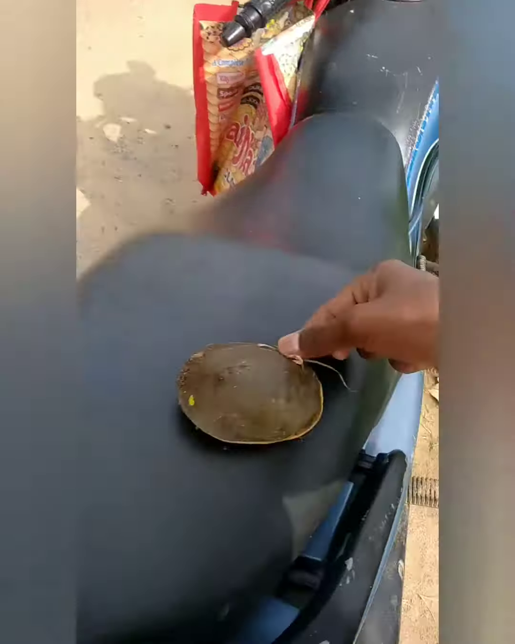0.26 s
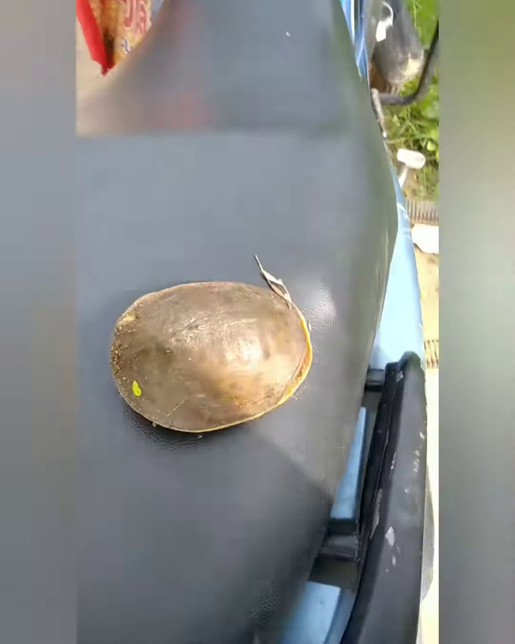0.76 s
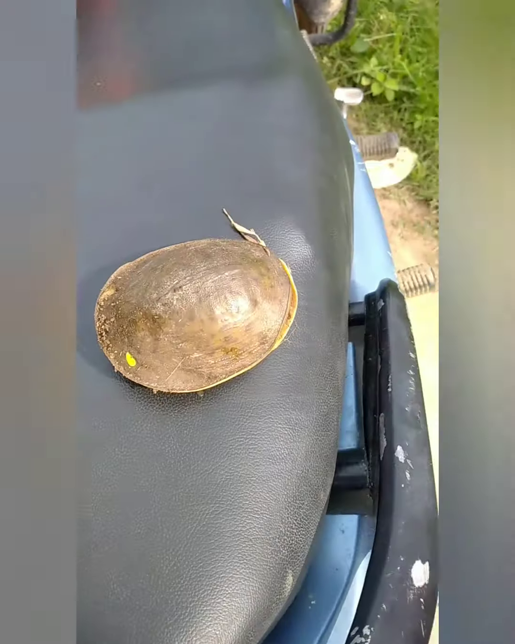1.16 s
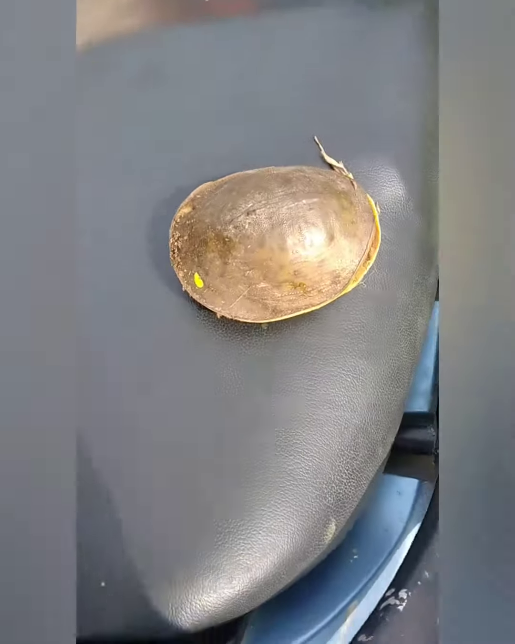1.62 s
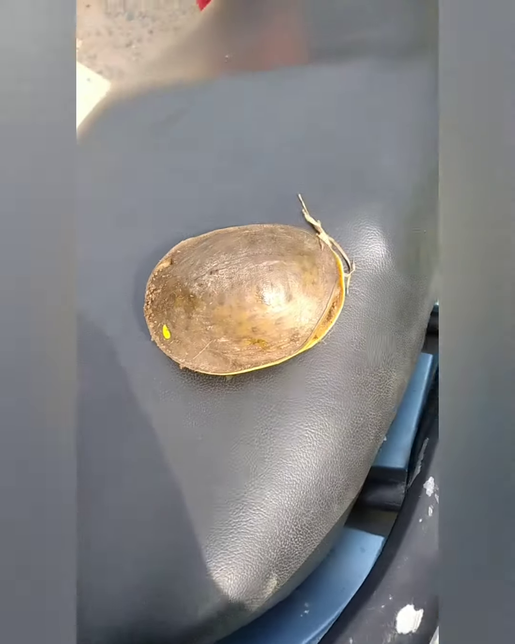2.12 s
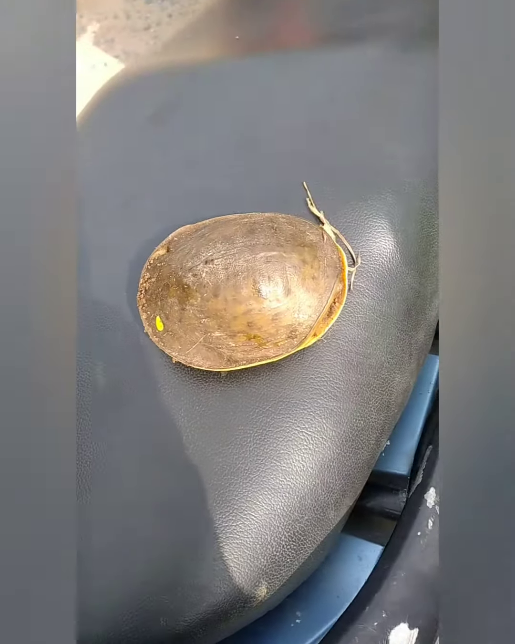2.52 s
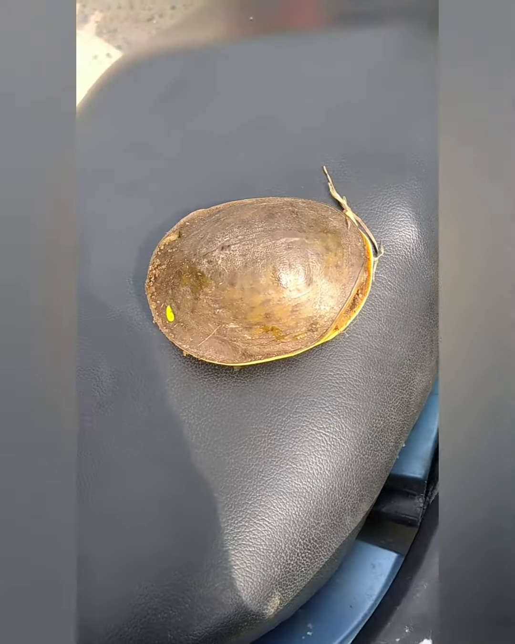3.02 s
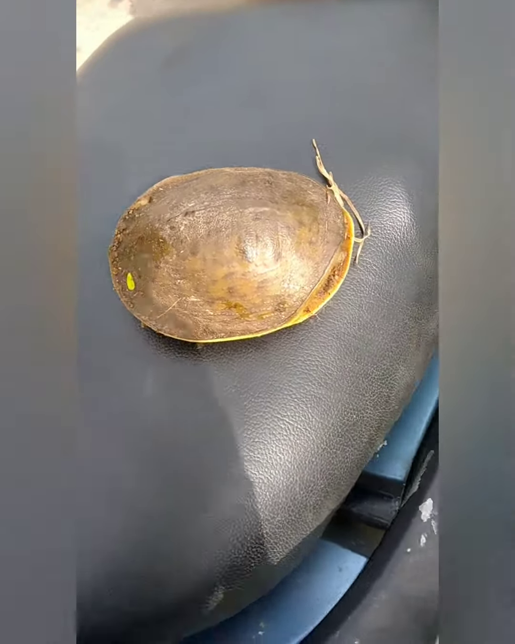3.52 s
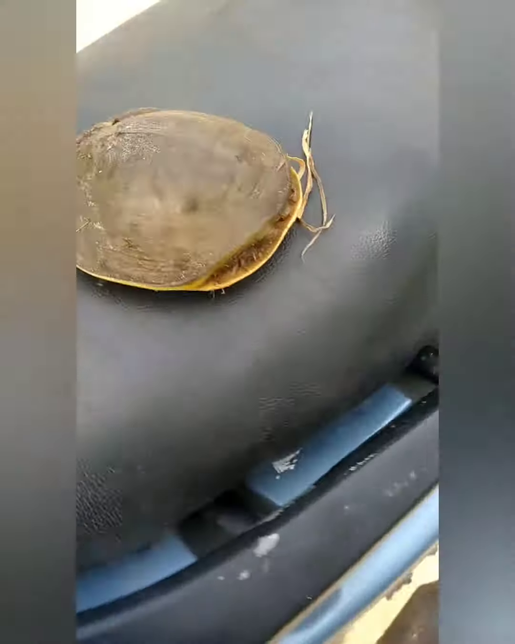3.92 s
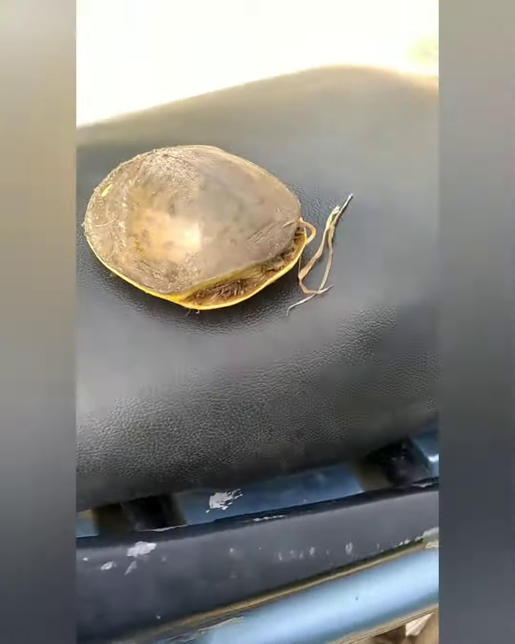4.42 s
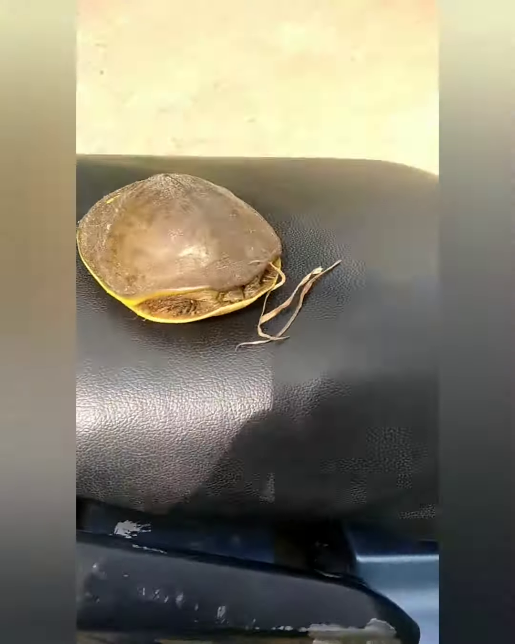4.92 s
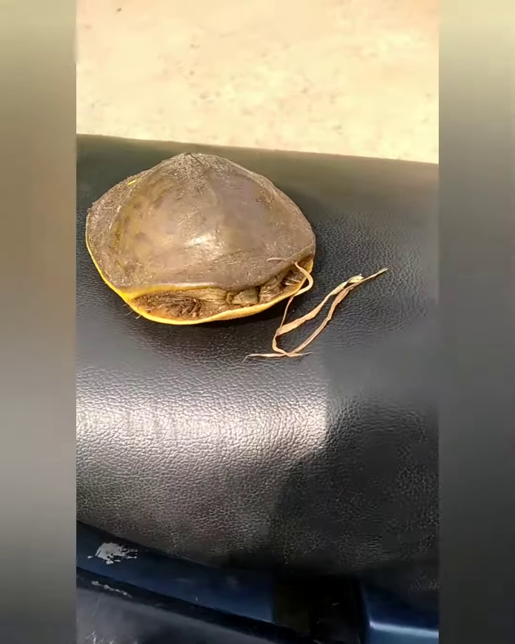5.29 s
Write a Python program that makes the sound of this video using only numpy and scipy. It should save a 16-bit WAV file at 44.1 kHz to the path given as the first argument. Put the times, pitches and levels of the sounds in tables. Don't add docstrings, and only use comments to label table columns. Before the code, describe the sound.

A quiet open-air scene on a handheld phone with two microphones. Low distant traffic hum, heavier on the left, and a thin insect fizz near 10 kHz run throughout, with slight gaps from phone processing. Faint short bird whistles slide or arch around 3 kHz, mostly in the first three seconds. From 0 to 1.4 s soles scuff softly on grit, with dry ticks at 0.3 s and a tight cluster near 0.67 s. At about 1.47 s a fingertip brushes the left microphone; from 1.6 s it drags with a rough stuttering rub, ending around 1.66 s in a loud dull knock, then a small bump at 1.78 s. The right side hears none of this. It stays calm until about 3.4 s, when grit ticks and scuffs return, at 3.8 and 4.0 s, then crisper crunches from 4.6 s, strongest near 5.3 s, fading out.

```python
import sys
import numpy as np
from scipy import signal
from scipy.fft import rfft, irfft
from scipy.io import wavfile
from scipy.ndimage import uniform_filter1d

SR = 44100
rng = np.random.default_rng(int(sys.argv[2]) if len(sys.argv) > 2 else 0)


def volts_from_decibels(level):
    exponent = np.asarray(level, float) / 20
    return 10 ** exponent


def master_out(mix):
    frames = np.transpose(np.atleast_2d(mix))
    ceiling = np.clip(frames, -1, 1)
    pcm = np.round(ceiling * 32767).astype(np.int16)
    wavfile.write(sys.argv[1], SR, pcm)


N = 244755
TIME = np.arange(N) / SR
FREQ = np.maximum(np.fft.rfftfreq(N, 1 / SR), 1)

# freq_hz, density_db
TRAFFIC_SPECTRUM = [(18, -60), (30, -25.5), (109, -1), (245, -3.5), (311, -13), (386, -12), (579, -13.5),
                    (684, -14.5), (848, -18.5), (1210, -19.5), (1780, -25.5), (3150, -25.5), (4090, -29),
                    (5200, -29), (9000, -28.5), (11700, -79), (19800, -120)]
# freq_hz, left_minus_right_db
PORT_BALANCE = [(60, 18), (110, 15), (200, 18), (380, 11.5), (700, -3), (1290, 1.5), (2380, -2.5),
                (4400, 1), (8120, -4), (15000, 37)]
# freq_hz, correlation_0_to_1
PORT_LIKENESS = [(60, 0.56), (130, 0.82), (300, .85), (640, 1), (1400, 0.37), (3100, 0.13), (6000, 0.038),
                 (15000, .05)]
PORT_LAG_S = 0.000348
# freq_hz, gain_db
RIGHT_PORT = [(20, 4), (9000, -3), (11500, -8), (16000, -32)]
# freq_hz, left_share_0_to_1, right_share_0_to_1
MUTED_SHARE = [(1500, 0, 0), (2800, .1, .08), (3800, .17, .13), (4600, .18, .16), (5000, .55, .55),
               (5400, .25, .25), (5800, .33, .33), (6500, .1, .1), (7600, .18, .18), (8400, .03, .03),
               (11000, 0, 0), (11400, .35, .9), (12200, .22, .75), (13000, .18, .6), (14200, .22, .65),
               (14500, .97, .98)]

# time_s, level_db
INSECT_LEVEL = [(0, -61), (.49, -62.5), (1.1, -59.5), (1.31, -62), (1.4, -60), (1.55, -65), (1.76, -59),
                (2.1, -61.5), (3.24, -61), (3.8, -60), (4.2, -57.5), (4.38, -58), (4.55, -63.5),
                (5.02, -60), (5.2, -62.5), (5.55, -63.5)]
# freq_hz, density_db
INSECT_SPECTRUM = [(4880, -38), (8300, -34), (8850, -22), (9710, -2.5), (10300, -2), (10800, -7),
                   (11100, -18), (11700, -26.5), (13300, -23.5), (14400, -45)]

# start_s, length_s, start_hz, end_hz, level_db
SLIDES = [
    (.92, .05, 3250, 2660, -67),
    (.965, .065, 2660, 2570, -68),
    (1.29, .05, 3000, 2600, -73),
    (1.63, .05, 3050, 2600, -67),
    (2.27, .11, 2750, 3400, -76),
    (2.43, .08, 3420, 3070, -70),
    (2.85, .08, 2880, 3280, -68),
    (3.56, .08, 2750, 2600, -73),
]
# start_s, length_s, edge_hz, top_hz, level_db
ARCHES = [
    (.075, .075, 2560, 2780, -64),
    (1.85, .16, 3140, 3560, -69),
    (2.93, .12, 3270, 3420, -78),
]

# peak_s, level_db, rise_s, fall_s, brightness_db
SCUFFS = [(.13, -59, .4, .2, -8.5), (.33, -65.5, 0.19, .1, -5), (.288, -53.5, 0.018, 0.033, -13),
          (.368, -55, 0.068, .008, 1.5), (.658, -57, .04, 0.17, -9), (.69, -54, .1, 0.011, -6),
          (.978, -62, 0.048, 0.24, -2), (1.218, -62, 0.32, 0.17, 1.5), (1.35, -63, 0.1, 0.083, -4),
          (3.44, -66, 0.28, .05, -1.5), (3.485, -56.5, 0.072, 0.054, -7), (3.6, -66, 0.12, 0.13, -6),
          (3.793, -49.5, 0.059, 0.015, 3.5), (3.86, -60, 0.16, 0.2, -6), (4.035, -55, 0.1, 0.047, -2),
          (3.752, -59, 0.011, .1, 3.5), (4.53, -65, 0.055, .25, -12), (4.654, -57, 0.23, 0.88, -1),
          (4.908, -53.5, 0.026, 0.096, 6), (4.97, -51.5, 0.11, 0.056, -8), (5.12, -74, 0.18, 0.46, -3),
          (5.21, -60, .014, 0.23, 4.5), (5.312, -47, .04, 0.076, -5), (5.4, -66, .1, 0.79, -1)]
# freq_hz, level_db
GRIT_BODY = [(500, -6), (1100, -6.5), (1900, 2.5), (3000, 1), (4200, 5), (5200, -9.5), (7000, -4.5)]
# freq_hz, level_db
GRIT_HISS = [(4500, 3.5), (5500, -12.5), (7600, 3.5), (8800, 4), (10200, 9.5), (11200, -13), (11800, -46)]
# freq_hz, level_db
GRIT_TOP = [(10800, -25), (11400, 1), (13000, 1.5), (14300, -1), (14700, -33), (16500, -38)]
# time_s, peak_db, ring_hz, left_minus_right_db
TICKS = [(.2216, -45, 2250, 8), (.2865, -35, 3400, 12), (.3255, -45, 1190, 22), (.6585, -34, 2290, 0),
         (0.664, -30, 1990, -16), (0.667, -34, 2330, 12), (.6745, -25.5, 2280, 5), (0.69, -44, 1960, 1.5),
         (.9702, -41.5, 2820, 23), (1.3142, -45, 1500, 30), (1.333, -44.5, 1310, 10), (1.506, -50, 1290, 6),
         (1.5244, -46, 1280, 2), (3.4182, -47, 1890, 12), (3.4454, -44, 3970, 15), (3.4517, -38.5, 3050, 4),
         (3.4604, -52, 3000, 1.5), (3.469, -51, 4500, 7), (3.477, -37, 1970, 12), (3.5018, -42, 1900, 14),
         (3.515, -45.5, 1860, 14), (3.7926, -35.5, 4070, 24), (3.9134, -42, 4040, 18),
         (4.53, -45, 2100, 11), (4.3234, -43, 3340, 15), (4.68, -40, 3160, 13), (4.72, -43, 3300, 5),
         (4.796, -43, 3020, 10), (4.904, -33, 4160, -11)]
# time_s, peak_db, ring_hz, crack_db
SNAPS = [(.365, -41.5, 2650, 4), (1.5144, -58, 2010, 4), (1.585, -56, 1610, 6), (2.4187, -58.5, 1270, 13),
         (2.5624, -66, 1260, 14), (3.353, -54, 2870, 5), (3.5535, -54.5, 2520, 18), (3.606, -53, 2570, 0),
         (3.781, -43, 3980, 8), (4.113, -56, 2980, 10), (4.0673, -38, 3510, -5), (4.7744, -54, 1950, 6),
         (4.835, -58, 3000, 8), (4.353, -62, 3000, 10), (4.614, -38, 2100, 2.5), (4.858, -58, 1440, 8),
         (4.892, -40.5, 3950, 9.5), (4.964, -38, 3540, 12.5), (4.9686, -36.5, 2750, -2),
         (4.974, -38, 3630, 5), (4.9904, -52, 4140, 6), (5.2101, -44.5, 3620, -4)]

# peak_s, level_db, rise_s, fall_s, pressure_db
GRAZES = [
    (1.472, -46.5, 0.053, 0.009, 5),
    (1.52, -60, .025, .03, 8),
    (1.59, -61, .013, 0.024, 6),
    (1.786, -64, .047, 0.13, 10.5),
]
# time_s, level_db, pressure_db
DRAG = [
    (1.601, -41, 3),
    (1.62, -37, -11),
    (1.64, -29.5, -6.5),
    (1.654, -28.5, -4.5),
    (1.661, -28.5, 0.5),
    (1.675, -29.5, -0.5),
    (1.689, -46, -18),
    (1.705, -50, 1.5),
    (1.76, -74, 9),
]
# freq_hz, level_db
SKIN_BODY = [(500, -15), (900, -10.5), (1400, 0), (1700, -3), (2100, -0.5), (2900, -3), (3300, -3),
             (4000, -3.5), (4500, 1), (4850, -11), (5500, -16)]
# freq_hz, level_db
SKIN_RUMBLE = [(30, -20), (70, -7), (120, 5), (220, -1), (490, 1.5), (680, -1), (850, 1), (1200, -6)]
# freq_hz, level_db
SKIN_HISS = [(4600, -37), (5200, -3), (7500, -2), (9000, -10), (10200, -12), (12000, -10.5), (14300, -5.5),
             (14800, -55)]
# time_s, peak_db, ring_hz, t60_s
BUMPS = [(1.598, -13.5, 450, 0.0069), (1.5982, -15, 900, 0.004), (1.641, -27, 1390, 0.0067),
         (1.652, -19, 1500, 0.014), (1.6598, -14, 490, 0.051), (1.6592, -16, 680, 0.05),
         (1.665, -15, 1450, 0.018), (1.6642, -17.5, 326, 0.029), (1.664, -16, 2090, 0.025),
         (1.662, -18.5, 980, 0.032), (1.6565, -25, 520, 0.02), (1.78, -25.5, 680, 0.0046),
         (1.779, -47, 1500, 0.0037), (4.991, -36, 740, 0.0073)]


def across(table, floor=None):
    hz, value = np.transpose(table)
    return np.interp(np.log(FREQ), np.log(hz), value, floor, floor)


def unit(x):
    return x / np.sqrt(np.mean(x ** 2))


def colour(x, table):
    return unit(irfft(rfft(x) * volts_from_decibels(across(table, floor=-88)), N))


def walk(rate_hz):
    hold = int(SR / rate_hz)
    steps = np.repeat(rng.standard_normal(N // hold + 1), hold)
    return 1.66 * uniform_filter1d(uniform_filter1d(steps, hold), hold)[:N]


def grains(per_s, spread_db, smooth, tail_s):
    hit, size = rng.random(N), rng.exponential(size=N)
    slips = (hit < per_s / SR) * volts_from_decibels(np.minimum(spread_db * size, 14))
    puffs = signal.lfilter([1], [1, -np.exp(-1 / (tail_s * SR))], slips)
    return (unit(puffs) + smooth) * rng.standard_normal(N)


def strokes(rows, per_db):
    t = TIME[::16]
    s, db, rise, fall, extra_db = np.transpose(rows)[..., None]
    before = (s - t) / np.maximum(rise, .003)
    after = (t - s) / np.maximum(fall, .003)
    away = np.where(t < s, before, after)
    power = volts_from_decibels(2 * (db + per_db * extra_db - 20 * np.minimum(away, 9))).sum(axis=0)
    return np.interp(TIME, t, np.sqrt(power))


def ring(hz, t60, seconds=.08):
    t = np.arange(int(seconds * SR)) / SR
    return np.sin(2 * np.pi * hz * t) * volts_from_decibels(-60 * t / t60) * (1 - np.exp(-t / 0.00017))


def add(out, x, s):
    i = int(s * SR)
    out[..., i:i + x.shape[-1]] += x[..., :N - i]


def ports(x, other, pan_db, like):
    late = np.interp(TIME - PORT_LAG_S, TIME, x)
    tilt = volts_from_decibels(-pan_db)
    right = tilt * (like * late + np.sqrt(1 - min(like, 1) ** 2) * other)
    return 2 / np.sqrt(1 + tilt ** 2) * np.array([x, right])


def air():
    left, other = rfft(rng.standard_normal((2, N)))
    like = np.clip(across(PORT_LIKENESS), 0, 1)
    tilt = volts_from_decibels(-across(PORT_BALANCE))
    late = left * np.exp(-2j * np.pi * FREQ * PORT_LAG_S)
    right = tilt * (like * late + np.sqrt(1 - like ** 2) * other)
    spectrum = volts_from_decibels(across(TRAFFIC_SPECTRUM, floor=-90)) / np.sqrt(1 + tilt ** 2 + like * tilt)
    pair = irfft(np.array([left, right]) * spectrum, N)
    level_db = -56 + 0.74 * walk(1.268) + 0.26 * walk(9)
    return pair * volts_from_decibels(level_db) / np.sqrt(np.mean(pair.mean(axis=0) ** 2))


def insects():
    s, db = np.transpose(INSECT_LEVEL)
    left, right = (colour(grains(400, spread_db=2.5, smooth=3.4, tail_s=0.00027), INSECT_SPECTRUM)
                   for _ in range(2))
    level = volts_from_decibels(np.interp(TIME, s, db) + 1.0 * walk(12))
    return level * ports(left, right, pan_db=1.0, like=0.068)


def bird():
    out, waver = np.zeros(N), walk(60)
    sag = .15
    notes = [(s, length, a, (a + b) / 2 - sag * abs(a - b), b, db) for s, length, a, b, db in SLIDES]
    notes += [(s, length, edge, top, edge, db) for s, length, edge, top, db in ARCHES]
    for s, length, start_hz, mid_hz, end_hz, db in notes:
        u = np.linspace(-1, 1, int(length * SR))
        bend_hz = (start_hz + end_hz) / 2 - mid_hz
        hz = mid_hz + (end_hz - start_hz) / 2 * u + bend_hz * u ** 2
        whistle = np.sin(2 * np.pi * np.cumsum(hz) / SR)
        add(out, volts_from_decibels(db) * (1 - u ** 4) * whistle, s)
    out = out * volts_from_decibels(2.5 * waver - 1)
    return ports(out, out, pan_db=-1.0, like=0.84)


def scuffs():
    body, hiss, top = strokes(SCUFFS, 0), strokes(SCUFFS, 1), strokes(SCUFFS, 0.85)
    heard = []
    for _ in range(2):
        crunch = grains(200, spread_db=5.0, smooth=.9, tail_s=.002)
        dust = grains(500, spread_db=1.0, smooth=0.76, tail_s=0.0016)
        scuff = body * colour(crunch, GRIT_BODY)
        scuff += volts_from_decibels(3.0) * hiss * colour(dust, GRIT_HISS)
        scuff += volts_from_decibels(-5.5) * top * colour(dust, GRIT_TOP)
        heard.append(scuff)
    return ports(*heard, pan_db=3, like=0.25)


def ticks():
    out = np.zeros((2, N))
    t = np.arange(900) / SR
    rows = [(s, db, hz, -20, 0.017, pan_db) for s, db, hz, pan_db in TICKS]
    rows += [(s, db, hz, crack_db, 0.016, 12.5) for s, db, hz, crack_db in SNAPS]
    crack_band = signal.butter(4, [7500, 13500], "bandpass", fs=SR, output="sos")
    noises = rng.standard_normal((len(rows), 900))
    for (s, db, hz, crack_db, t60, pan_db), noise in zip(rows, noises):
        burst = (0.35 * noise + 2.67 * (t == 0)) * volts_from_decibels(-60 * t / t60)
        modes = ((hz, 6.0, 0), (min(1.334 * hz, 4300), 7.0, -1.5), (1200, 2.5, -8))  # Hz, Q, dB
        body = sum(volts_from_decibels(mode_db) * signal.lfilter(*signal.iirpeak(f, q, fs=SR), burst)
                   for f, q, mode_db in modes)
        crack = signal.sosfilt(crack_band, burst)
        snap = volts_from_decibels(db) * (body / abs(body).max() + volts_from_decibels(crack_db) * crack / abs(crack).max())
        share = 2 / np.sqrt(1 + volts_from_decibels(-2 * pan_db))
        add(out[0], share * snap, s)
        add(out[1], share * volts_from_decibels(-pan_db) * snap, s + PORT_LAG_S)
    return out


def fingertip():
    s, db, press_db = np.transpose(DRAG)
    firm = uniform_filter1d(volts_from_decibels(np.interp(TIME, s, db, -200, -200)), size=90)
    gain = firm + strokes(GRAZES, 0)
    rumble = firm * volts_from_decibels(np.interp(TIME, s, press_db)) + strokes(GRAZES, 1)
    hiss = np.minimum(gain * volts_from_decibels(-4), volts_from_decibels(-44.5))
    slips = [grains(604, spread_db=9.0, smooth=2.2, tail_s=0.0036) for _ in range(3)]
    skin = gain * colour(slips[0], SKIN_BODY)
    skin += hiss * colour(slips[1], SKIN_HISS)
    skin += volts_from_decibels(-4.5) * rumble * colour(slips[2], SKIN_RUMBLE)
    drag = 2 * skin
    for s, db, hz, t60 in BUMPS:
        add(drag, volts_from_decibels(db) * ring(hz, t60), s)
    add(drag, volts_from_decibels(-11.5) * ring(113, 0.048), 1.6575)
    return np.array([drag, np.zeros(N)])


def scene():
    return air() + insects() + bird() + scuffs() + ticks() + fingertip()


def mute_quiet_bands(x, count=5):
    hz, _, cells = signal.stft(x, SR, nperseg=1024)
    bands = len(hz) // count
    power = (abs(cells[:, :count * bands]) ** 2).reshape(2, bands, count, -1).mean(axis=2)
    chance = uniform_filter1d(rng.standard_normal((1,) + power.shape[1:]), size=5, axis=2)
    power = uniform_filter1d(power, size=3, axis=2) * volts_from_decibels(16 * chance)
    rank = power.argsort(axis=2).argsort(axis=2) / power.shape[2]
    table_hz, *shares = np.transpose(MUTED_SHARE)
    share = np.array([np.interp(hz[2::count][:bands], table_hz, column) for column in shares])
    cells[:, :count * bands] *= np.repeat(rank >= share[..., None], count, axis=1)
    return signal.istft(cells, SR, nperseg=1024)[1][:, :N]


def low_pass(x):
    return signal.sosfilt(signal.butter(12, 15600, fs=SR, output="sos"), x)


def record(dry):
    bass_cut = signal.butter(4, 50, "highpass", fs=SR, output="sos")
    left, right = signal.sosfilt(bass_cut, dry)
    right = irfft(rfft(right) * volts_from_decibels(across(RIGHT_PORT)), N)
    mix = mute_quiet_bands(np.array([left, right]))
    return low_pass(mix)


dry = scene()
out = record(dry)
master_out(out)
```